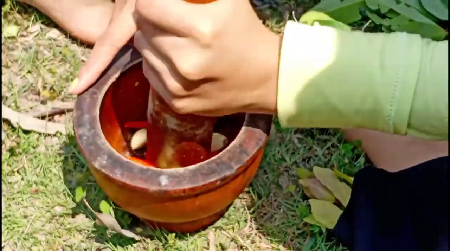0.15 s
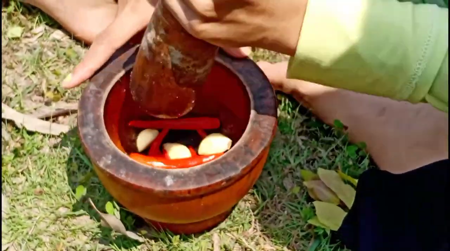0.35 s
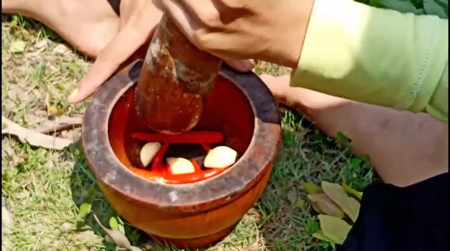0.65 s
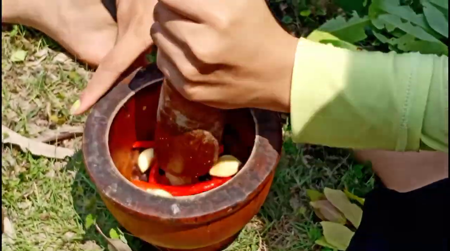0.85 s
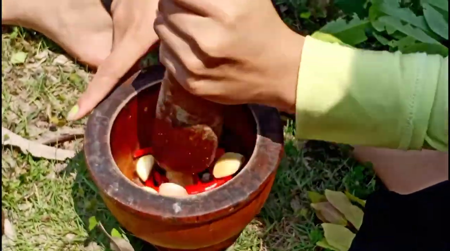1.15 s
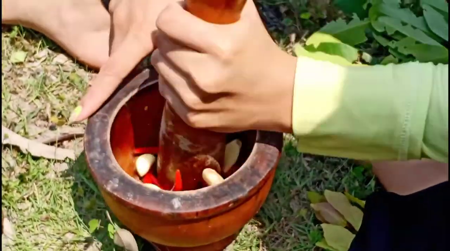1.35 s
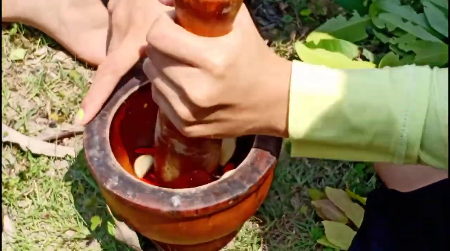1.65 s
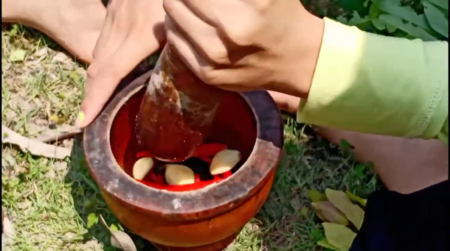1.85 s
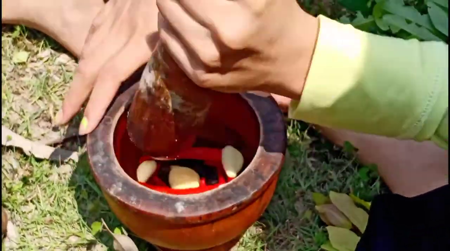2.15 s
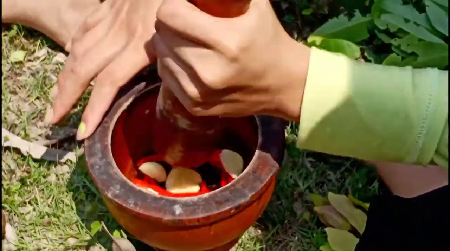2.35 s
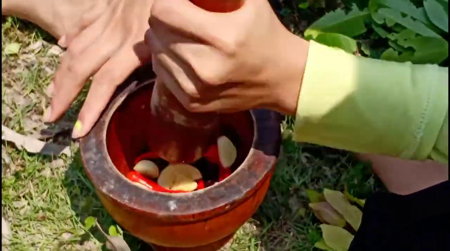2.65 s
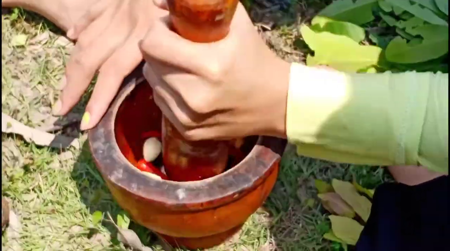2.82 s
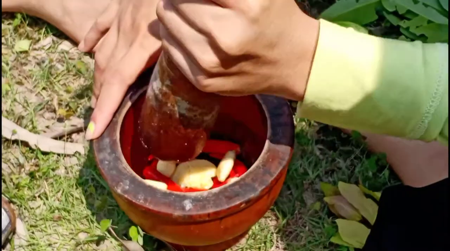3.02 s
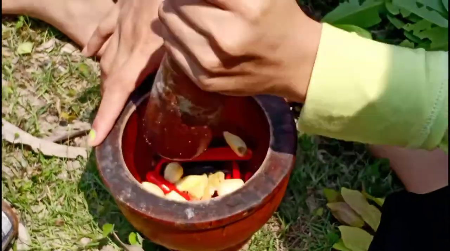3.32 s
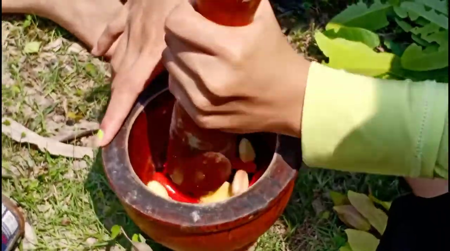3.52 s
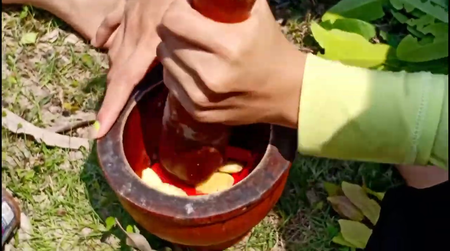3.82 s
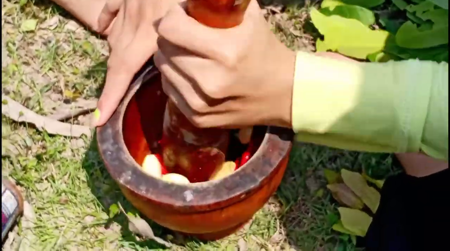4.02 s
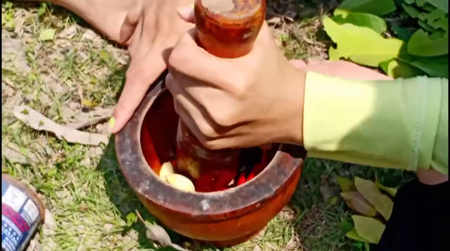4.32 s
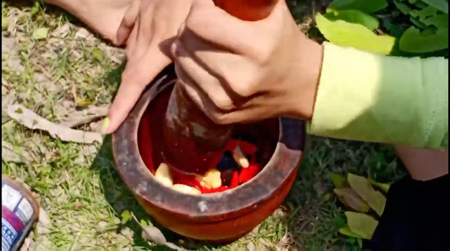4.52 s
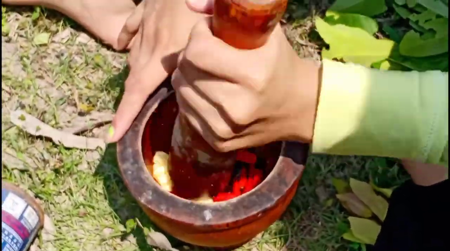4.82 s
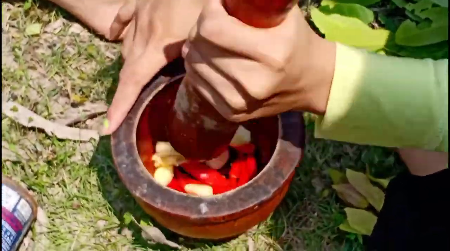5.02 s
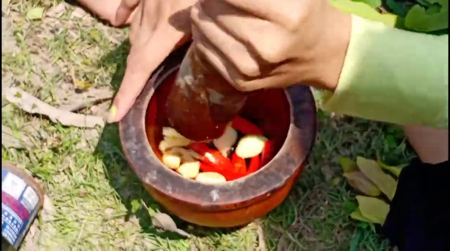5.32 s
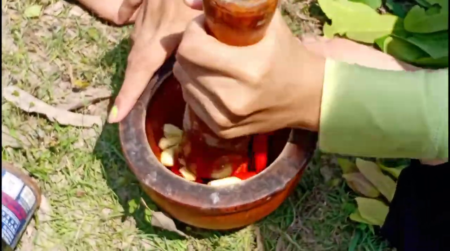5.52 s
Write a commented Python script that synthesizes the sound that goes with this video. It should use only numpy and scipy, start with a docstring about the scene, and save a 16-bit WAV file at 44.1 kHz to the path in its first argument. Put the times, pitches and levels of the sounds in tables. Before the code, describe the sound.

Outdoors on grass, a wooden pestle pounds garlic and chilies in a clay mortar very close to a stereo microphone. Twenty blows come evenly, roughly every 0.3 seconds, from 0.05 to 5.56 seconds. Each joins a brief wet crunch, a short clack of clay and a dull, low thud into the turf. The first few are fairly soft; from 1.2 seconds they harden and clack more, peaking with the sharpest knock near 2.96. From 3.2 on they are softer, thicker and mushier, with weak blows at 4.4, 5.0 and 5.3. Juicy squelches colour many hits, and hollow little plops sound between them, notably at 1.7, 2.2, 2.5 and 4.8. Bits snap with small ticks, clearer near 3.8, 5.0 and 5.57. Cloth brushes faintly around 1.4, 2.9 and 4.7. Behind lie a low traffic drone, airy hiss, and distant engines, one passing near 2.7, another nearing around 4.9. Hardly any echo.

```python
"""On grass outdoors, a wooden pestle pounds garlic and chilies in a clay mortar, close to the microphone.
Each blow is a short crunch of flesh (clumped noise), a clack on the clay (ringing modes) and a dull low thud.
Wet pockets squelch and the bowl's air plops as filtered noise and soft tones; bits and crumbs tick.
A sleeve rubs now and then as soft noise. Behind it all lie humming far engines, a low drone and an airy hiss."""
import sys
import numpy as np
from scipy import signal
from scipy.fft import rfft, irfft, next_fast_len
from scipy.io import wavfile
from scipy.ndimage import uniform_filter1d, map_coordinates

SR = 44100
rng = np.random.default_rng(int(sys.argv[2]) if len(sys.argv) > 2 else 0)


def output_pcm(signal):
    """Save a mono or channel-first signal as 16-bit PCM at the path in sys.argv[1].

    Samples are clipped to [-1, 1] before scaling.
    """
    pcm = np.clip(np.atleast_2d(signal).T, -1, 1) * 32767
    wavfile.write(sys.argv[1], SR, np.round(pcm).astype(np.int16))


N = 250047
SECONDS = np.arange(N) / SR  # time through the whole scene
LEAD = SR // 20  # samples kept ahead of a contact
T = np.arange(-LEAD, 2 * LEAD) / SR  # time around a contact, which is at 0
AFTER = np.maximum(T, 0)  # time since the contact

# Blows of the pestle; the levels are settings for each part of a blow.
# columns: t/s, force/dB, crushing time/s, clack on the clay/dB, air pushed from the bowl/dB, spray of juice/dB
BLOWS = [(.0536, -28, .0022, -29, -25.5, -45), (.3255, -26.5, .0045, -21, -29, -47),
         (.6005, -22.5, .0029, -18.5, -34, -40), (.8868, -23, .0025, -22, -17.5, -39),
         (1.1712, -23.5, .0031, -11.5, -29, -41), (1.464, -20.5, .0047, -14, -31, -36),
         (1.771, -22.5, .004, -9, -29, -35), (2.0737, -20, .004, -15.5, -27, -39.5),
         (2.3711, -19.5, .0035, -12, -22.5, -36), (2.667, -20.5, .0028, -8.5, -25, -38.5),
         (2.9646, -18.2, .0035, -2.8, -14.5, -35), (3.2312, -30.5, .0083, -22, -32, -37),
         (3.531, -28, .0065, -26, -31, -39), (3.8232, -27, .0051, -24, -29, -42.5),
         (4.1139, -21.5, .0045, -20.5, -32.5, -42), (4.411, -37, .013, -26, -44, -42),
         (4.6971, -24.5, .0064, -23, -33, -37), (4.987, -35, .011, -24.5, -34, -43.5),
         (5.2711, -33.5, .0097, -28, -37, -47), (5.5593, -24.5, .0064, -17, -32, -38.5)]
# Tone of crushed flesh: f/Hz, relative level/dB
FLESH = [(200, -41), (450, 1), (630, -19), (760, -7.5), (950, -0.5), (1150, -1.5), (1450, -1), (1800, 7.5),
         (2150, -2), (2550, 4.5), (3400, -3.5), (5000, 1), (6100, 2), (7200, -14.5), (9500, -27.5),
         (16000, -48)]

USUAL_FORCE_DB, USUAL_CLACK_DB, USUAL_CRUSHING_S = -25, -18, .0045  # an average blow
CRUNCH_DB = -29  # at an average blow
CRUNCH_GROWS, CRUNCH_SPREAD_DB = .44, 1.8  # dB per dB of force; loss per doubling of the crushing time
GRIT_DB, GRIT_DB_PER_S = 1.5, 130  # unevenness of the crunch: thick pieces break more raggedly
THUD_DB, THUD_HZ = -22.8, 298  # at an average blow
SOFTEST_THUD_HZ, THUD_OCTAVE_DB = 208, 9.5  # lowest pitch; extra force that doubles the pitch
# The thud comes sooner after a hard clack, or when thick flesh has already pushed the mortar.
THUD_LAG_S, LAG_S_PER_DB, LAG_CUSHION = .0042, .00022, .5  # average lag; s per dB of clack; s per s of crushing


def amp(db):
    """Turn decibels into an amplitude factor."""
    return 10 ** (np.asarray(db) / 20)


def unit(x):
    """Scale a sound to an rms of 1."""
    return x / np.sqrt(np.mean(x ** 2) + 1e-20)


def along(points, hz):
    """Read a curve of (Hz, value) points, drawn with straight lines on a log frequency axis."""
    f, v = np.transpose(points)
    return np.interp(np.log(hz + 1), np.log(f + 1), v)


def wobble(rate):
    """A smooth random curve through rate random points a second."""
    points = rng.standard_normal(int(N * rate / SR) + 4)
    return map_coordinates(points, [np.arange(N) * rate / SR])


def filtered(x, response):
    """Change the strength and timing of each frequency in x by a response curve."""
    n = x.shape[-1]
    m = next_fast_len(n + LEAD)
    spectrum = rfft(x, m) * response(np.fft.rfftfreq(m, 1 / SR))
    return irfft(spectrum, m)[..., :n]


def add(track, s, sound):
    """Lay a contact's sound into the track, with the contact at s seconds."""
    at = round(s * SR) - LEAD + np.arange(len(T))
    inside = (at >= 0) & (at < N)
    track[at[inside]] += sound[inside]


def swell(rise, t60):
    """A bell-shaped rise to the contact, then a fall by 60 dB in t60 seconds."""
    return np.exp(-(np.minimum(T, 0) / rise) ** 2) * amp(-60 * AFTER / t60)


def crackle(envelope, spectrum, spread_db):
    """Tiny ruptures of uneven size, in clumps of a millisecond, with the energy of the envelope."""
    clumps = unit(uniform_filter1d(rng.standard_normal(len(T)), size=44))
    bursts = rng.standard_normal(len(T)) * amp(spread_db * clumps) * envelope
    sound = filtered(bursts, lambda hz: amp(along(spectrum, hz)))
    return unit(sound) * np.sqrt(np.mean(envelope ** 2))


def hollow(hz, width_hz, envelope):
    """A resonance kept ringing by random ruptures, with the energy of the envelope."""
    def resonance(f):
        damping = 1j * f * width_hz
        return (damping / (hz * hz - f * f + damping)) ** 2

    sound = filtered(rng.standard_normal(len(T)) * envelope, resonance)
    return unit(sound) * np.sqrt(np.mean(envelope ** 2))


def rush(spectrum):
    """Steady stereo noise: alike in the bass, mostly unrelated in the treble and opposed at the very top."""
    # Left-right likeness of the background: f/Hz, likeness (1 same, 0 unrelated, -1 opposite)
    likeness = [(60, 1), (130, 0.84), (290, 0.69), (640, 0.3), (1410, -0.029), (3100, -0.0088),
                (6820, -0.016), (15000, -0.75)]

    def mid_and_side(hz):
        turn = np.arccos(np.clip(along(likeness, hz), -1, 1)) / 2
        return amp(along(spectrum, hz)) * np.array([np.cos(turn), np.sin(turn)])

    mid, side = filtered(rng.standard_normal((2, N)), mid_and_side)
    return np.array([mid + side, mid - side]) / np.std(mid)


def road_position(closest_s, half_s):
    """Place at steady speed: 0 when closest, 1 when as far along the road as the road is away."""
    return (SECONDS - closest_s) / half_s


def engine(rate, road, orders):
    """A far exhaust note: multiples of the cycle rate that each waver on their own and fade with distance."""
    turn = 2 * np.pi * np.cumsum(rate) / SR
    note = np.zeros(N)
    for multiple, level in orders:
        strength = amp(level + 2 * wobble(2.96))
        note += strength * np.sin(multiple * turn + .8 * wobble(3.6))
    return note / np.hypot(1, road)


def engines():
    """One engine passes and drops in pitch; another draws near, easing off and picking up."""
    # Exhaust notes of the passing engine: multiple of the cycle rate, relative level/dB
    passing_orders = [(2, -13.5), (3, -28), (4, 4), (5, 0), (6, -16), (8, -16.5), (10, -21)]
    # Exhaust notes of the nearing engine: multiple of the cycle rate, relative level/dB
    nearing_orders = [(3, -20.5), (4, -10), (5, -2), (6, 1), (7, -22.5), (8, -15), (9, -8), (10, -8),
                      (11, -11.5), (12, -22)]
    # Speed of the nearing engine: t/s, cycle rate/Hz
    nearing_speed = [(0, 23.3), (3, 24.5), (3.85, 26.6), (4.35, 25), (4.8, 24), (5.1, 24.5), (5.4, 25.6)]

    first = road_position(closest_s=2.7, half_s=.3)
    second = road_position(closest_s=4.9, half_s=.8)
    passing_rate_hz, doppler_share = 28.8, .045  # steady speed; largest pitch shift either side
    heard_rate = passing_rate_hz * (1 - doppler_share * first / np.hypot(1, first))
    passing = engine(heard_rate, first, passing_orders)
    nearing = engine(np.interp(SECONDS, *np.transpose(nearing_speed)), second, nearing_orders)
    return amp(-59.5) * passing + amp(-56.5) * nearing


def outdoors():
    """Far traffic and engines under a soft, slightly flickering hiss of air and leaves, made of noise."""
    # Tone of the traffic drone: f/Hz, relative level/dB
    traffic_tone = [(20, -24), (40, -22), (65, -9), (95, -4), (125, -1), (160, -6.5), (200, -12),
                    (270, -17.5), (380, -25), (700, -54)]
    # Tone of the airy hiss: f/Hz, relative level/dB
    air_tone = [(180, -14), (310, -1), (520, -4), (930, -1.5), (1300, -8), (1800, -7.5), (2650, -2.5),
                (3000, -9.5), (3700, -15), (5000, -12.5), (6200, -14), (7300, -21), (10000, -24),
                (13800, -20), (16000, -24)]

    drone_level = -60 + .3 * SECONDS + wobble(11)  # dB, slowly rising
    drone = amp(drone_level) * rush(traffic_tone)
    air = rush(air_tone)
    low = filtered(air, lambda hz: 1 / (1 + (hz / 3200) ** 8))
    breeze = amp(-63 + .8 * wobble(42)) * unit(low)
    leaves = amp(-68.7 + 0.796 * wobble(56)) * unit(air - low)
    return engines() + drone + breeze + leaves


def yard(x):
    """A short scatter from the ground and the body nearby: fading noise echoes, new every 0.3 s."""
    # How long the scatter lasts: f/Hz, time to fall by 60 dB/s
    fading = [(150, .09), (900, 0.087), (3000, 0.12), (6000, 0.11), (14000, 0.076)]
    step = SR * 3 // 10
    out = np.zeros((2, N + SR))
    for start in range(0, N, step):
        hz, t, z = signal.stft(rng.standard_normal((2, SR // 4)), SR, nperseg=256)
        decay = amp(-60 * t / along(fading, hz)[:, None])
        tail = signal.istft(z * decay, SR, nperseg=256)[1]
        piece = x[None, start:start + step]
        echo = signal.fftconvolve(piece, tail / np.linalg.norm(tail[0]), axes=1)
        out[:, start:start + echo.shape[1]] += echo
    return out[:, :N]


def rubbing():
    """Sleeve and hand brush softly as the grip shifts: noise that swells, fades and flutters."""
    # Tone of cloth: f/Hz, relative level/dB
    cloth = [(400, -12), (1000, -5), (1500, -8), (2600, -1), (3600, -9), (5000, -3), (6100, 3), (7100, -14),
             (10000, -20), (14000, -5), (16000, -12)]
    # Rubs: t/s, level/dB, half length/s, centre of the favoured band f/Hz, half width of that band/octaves
    rubs = [(.833, -62.5, .017, 5600, .6), (1.375, -56, .028, 2600, .22), (2.86, -54.8, .1, 3200, 1.3),
            (3.2, -63.5, .25, 3700, 1.3), (4.73, -60, .05, 5000, .7)]
    out = np.zeros((2, N))
    for s, db, half, centre_hz, octaves in rubs:
        def tone(hz):
            away = np.log2((hz + 1) / centre_hz) / octaves
            return amp(along(cloth, hz) - 3 * away ** 2)

        fibres = filtered(rng.standard_normal((2, N)), tone)
        out += amp(db) * np.exp(-((SECONDS - s) / half) ** 2) * unit(fibres)
    return out * amp(2.2 * wobble(140))


def bits():
    """Larger bits of garlic and chili snap as small wet ticks; after each blow a few crumbs drop back."""
    # Snapping bits: t/s, level/dB, length/s
    snaps = [(1.19, -46, .0026), (1.615, -52.5, .0043), (1.792, -46, .0034), (3.027, -52, .011),
             (3.2615, -39.5, .00063), (3.463, -49, .0018), (3.815, -36, .0016), (3.847, -41.5, .0039),
             (4.007, -50.5, .0038), (4.138, -45, .0074), (4.97, -35, .0015), (5.2, -49.5, .003),
             (5.57, -31, .0013)]
    # Tone of a tick: f/Hz, relative level/dB
    tick = [(300, -19), (1000, 0.5), (2500, -1.5), (3400, -3.5), (5000, 0), (6200, -3), (7500, -10.5),
            (10000, -25.5), (14000, -11.5), (16000, -22)]
    crumbs = []
    for s, *_ in BLOWS:
        for _ in range(3):
            delay = 0.011 + .015 * rng.exponential()  # s
            crumbs.append((s + delay, -58 + 2.8 * rng.standard_normal(), .003))
    track = np.zeros(N)
    for s, db, length in [*snaps, *crumbs]:
        add(track, s, amp(db) * crackle(swell(length / 2, t60=7 * length), tick, spread_db=5))
    return track


def bowl_note(half):
    """A soft, hollow note of the air between pestle and bowl; the pitch sags and a faint ring stays."""
    hz = 950 * (1 + .015 * rng.standard_normal())
    note = np.exp(-(T / half) ** 2) * np.sin(2 * np.pi * hz * (T - 0.89 * T ** 2))
    ring = amp(-21) * hollow(hz, width_hz=250, envelope=swell(half, t60=.07))
    wet = amp(-28) * crackle(swell(half, t60=.02), FLESH, spread_db=8.5)
    return note + ring + wet


def plops():
    """The air in the bowl sounds as the wet pestle lets go of the paste or first touches it."""
    # Soft hollow plops of the bowl's air: t/s, level/dB, half length/s
    air_notes = [(.736, -49, .0056), (1.349, -39.5, .0045), (1.7205, -27.5, .0042), (2.189, -34, .0075),
                 (2.536, -34.5, .0045), (2.82, -50, .011), (2.948, -37.5, .004), (3.221, -31, .0022),
                 (3.5244, -36.5, .0034), (3.59, -49, .0064), (4.396, -36, .0035), (4.843, -32, .0038),
                 (5.347, -36.5, .0043), (5.362, -35.5, .0043)]
    track = np.zeros(N)
    for s, db, half in air_notes:
        add(track, s, amp(db) * bowl_note(half))
    return track


def squelches():
    """Wet pockets burst under the pestle; small ones ring higher and are more damped."""
    # Bursting juicy pieces: t/s, level/dB, f/Hz
    pockets = [(.6005, -32, 2470), (1.1712, -22, 2640), (1.1722, -25, 5000), (1.464, -22, 4100),
               (1.771, -23.5, 2610), (2.3711, -22.5, 2950), (2.667, -25, 2600), (2.9646, -21, 1720),
               (3.531, -23.5, 2580), (3.8232, -28.5, 5140), (4.6971, -22.5, 4550), (5.5593, -27, 2500)]
    burst = swell(rise=.0033, t60=.018)
    track = np.zeros(N)
    for s, db, hz in pockets:
        add(track, s, amp(db) * hollow(hz, width_hz=hz ** 2 / 22000, envelope=burst))
    return track


def pressing(crushing):
    """Pressure on the flesh: a first touch, a rise to the contact and a fall, with faint stirring around it."""
    touch = np.clip((T + 1.75 * crushing) / 0.0035, 0, 1) ** 2
    fall = swell(crushing, t60=0.015 + 3.26 * crushing)  # thick pieces take longer to give way
    stirring = amp(-26) * swell(.005 + 1.2 * crushing, t60=0.08)
    return touch * fall + stirring


def clack():
    """The pestle meets clay through a film of paste: modes start together, each time at new strengths."""
    # Ringing modes of the clay: f/Hz, relative level/dB, time to fall by 60 dB/s
    clay_modes = [(447, -5.5, 0.03), (738, -3.5, 0.02), (1270, -9.5, 0.009), (1785, -5.5, 0.024),
                  (2566, -7.5, 0.017), (2910, -15.5, 0.015), (3800, -5.5, 0.0071), (4200, 0, 0.0065),
                  (4630, 4.5, 0.0037), (5210, 1, 0.0027), (6150, -16.5, 0.0042), (13100, -20.5, 0.0068)]
    hz, db, t60 = np.transpose(clay_modes)[:, :, None]
    size, detune = rng.standard_normal((2, len(clay_modes), 1))
    strength = amp(db + 2.2 * size - 60 * AFTER / t60)
    ring = np.sum(strength * np.sin(2 * np.pi * hz * (1 + 0.022 * detune) * AFTER), 0)
    ring *= 1 - np.exp(-AFTER / 0.0002)  # the paste softens the start
    ring = filtered(ring, lambda f: 1 - 1 / (1 + (f / 330) ** 4))  # a small bowl radiates little bass
    return 0.31 * unit(ring) * np.sqrt(0.0015 * SR / len(T))


def thud(hz):
    """The mortar is shoved into the turf: a short low pulse and a deeper tone, with the treble cut away."""
    body = -np.cos(2 * np.pi * hz * T) * swell(rise=0.0013, t60=0.014)
    turf = np.sin(2 * np.pi * 150 * AFTER) * amp(-60 * AFTER / 0.022)
    return filtered(body + amp(-1) * turf, lambda f: (1 - 1 / (1 + (f / 95) ** 4)) / (1 + (f / 590) ** 14))


def pounding():
    """Flesh gives way until the pestle stops and the mortar takes the blow; force and crushing time shape it."""
    # Tone of spurting juice: f/Hz, relative level/dB
    juice = [(3000, -40), (6000, -5), (7800, 0), (10000, -9), (12000, -3), (13600, 3), (15200, 0),
             (16000, -8)]
    track = np.zeros(N)
    for s, force_db, crushing, clack_db, air_db, spray_db in BLOWS:
        effort_db = force_db - USUAL_FORCE_DB
        pressure = pressing(crushing)

        thickness = np.log2(crushing / USUAL_CRUSHING_S)
        crunch_db = CRUNCH_DB + CRUNCH_GROWS * effort_db - CRUNCH_SPREAD_DB * thickness
        grit_db = GRIT_DB + GRIT_DB_PER_S * crushing
        crunch = amp(crunch_db) * crackle(pressure, FLESH, spread_db=grit_db)

        jet = swell(0.44 * crushing, t60=0.019 + 2.0 * crushing)  # juice spurts at peak pressure
        jet += amp(-28) * swell(2 * crushing, t60=0.26)
        spray = amp(spray_db) * crackle(jet, juice, spread_db=3.5)

        bowl = amp(air_db - 3.5) * hollow(942, width_hz=200, envelope=pressure)

        sooner = LAG_S_PER_DB * (clack_db - USUAL_CLACK_DB)
        cushion = LAG_CUSHION * (crushing - USUAL_CRUSHING_S)
        lag = THUD_LAG_S - sooner - cushion
        thud_hz = max(SOFTEST_THUD_HZ, THUD_HZ * 2 ** (effort_db / THUD_OCTAVE_DB))  # harder sounds higher

        add(track, s - .0012, bowl)  # air escapes ahead of the contact
        add(track, s, crunch + spray)
        add(track, s - .0003, amp(clack_db + 2.2) * clack())
        add(track, s + lag, amp(THUD_DB + effort_db) * thud(thud_hz))
    return track


def scene():
    """The mortar close to two microphone ports, with its scatter, the rubbing and the outdoors."""
    # Loudness of the mortar at the two ports: f/Hz, left minus right/dB
    port_level = [(100, -1.5), (780, 0), (1000, -2.5), (1600, 0), (2100, -3), (2800, 1), (3200, -4),
                  (4800, -3), (5700, 11), (7200, 0), (8700, 5), (13000, 0)]
    # Timing of the mortar at the two ports: f/Hz, lead of the left/radians
    port_phase = [(550, 0), (850, -.55), (2050, -.35), (2800, .6), (3350, -1), (4300, -.4), (5100, .6),
                  (6200, 1.7), (9000, 1.5), (13000, 1.2)]
    mortar = pounding() + squelches() + plops() + bits()
    sides = np.array([[.5], [-.5]])  # left and right each take half of a difference

    def ports(hz):
        return amp(sides * along(port_level, hz)) * np.exp(1j * sides * along(port_phase, hz))

    near = filtered(mortar, ports)
    # the treble drifts slowly and randomly between left and right
    treble = filtered(mortar, lambda hz: 1j * hz / np.hypot(hz, 1800))
    drift = amp(2) * wobble(3.4) * treble
    return near + sides * drift + amp(-18.5) * yard(mortar) + rubbing() + outdoors()


def record(dry):
    """The microphone rounds off the very highest peaks; a steep cut removes what lies above 15.8 kHz."""
    rounded = dry / (1 + (dry / .8) ** 6) ** (1 / 6)
    return filtered(rounded, lambda hz: 1 / (1 + (hz / 15800) ** 120))


dry = scene()
out = record(dry)
output_pcm(out)
```